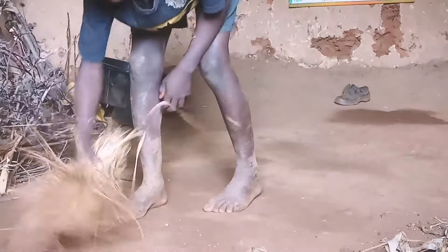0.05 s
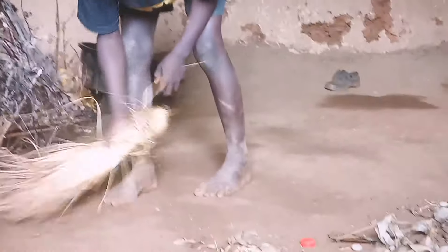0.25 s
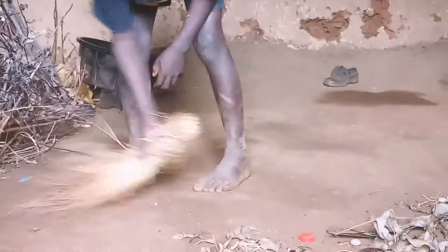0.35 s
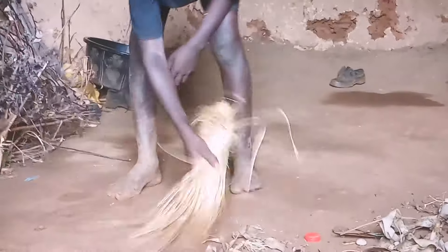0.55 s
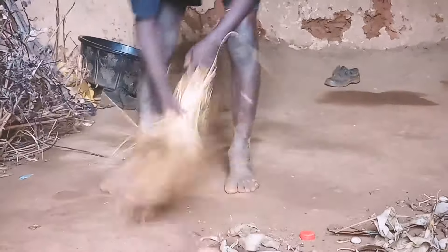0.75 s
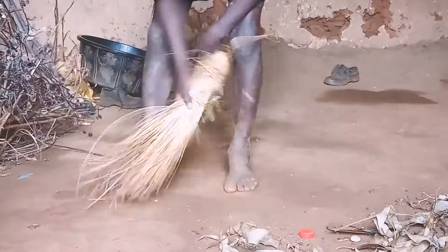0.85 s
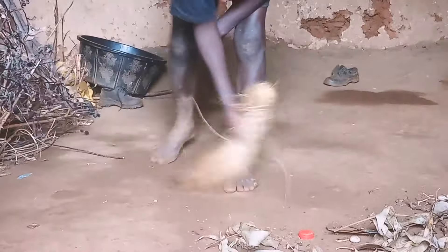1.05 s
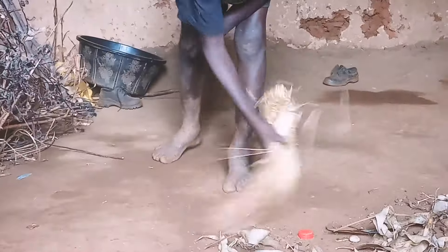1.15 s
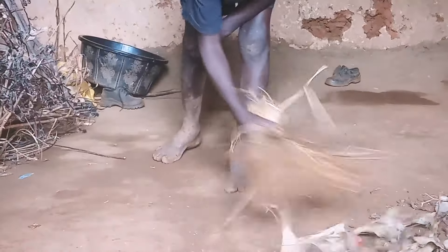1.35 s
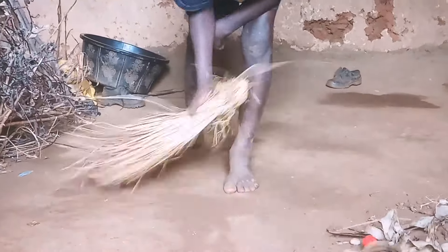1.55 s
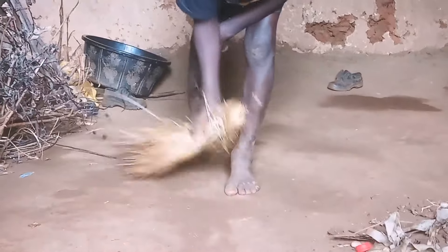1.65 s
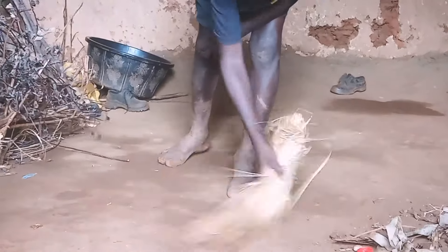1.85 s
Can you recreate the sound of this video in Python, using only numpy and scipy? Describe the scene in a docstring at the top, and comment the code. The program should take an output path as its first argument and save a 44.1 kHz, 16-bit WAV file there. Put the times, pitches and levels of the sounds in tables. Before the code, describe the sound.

A straw hand broom sweeps a dirt yard close to the microphone. Two firm, rasping strokes crush dry leaves and scatter a little grit, then a lighter stroke follows over quiet outdoor air.

```python
"""A straw hand broom sweeps a dirt yard close by: two firm strokes, then a light one.
Hundreds of straw tips catch and slip over rasping dirt and hissing sand, the bundle scuffs the
packed earth, and dry leaves are crushed on the way. Flung grit patters down after the firm strokes,
single straws snap, and the house wall answers faintly over quiet outdoor air."""
import sys
import numpy as np
from scipy import signal
from scipy.fft import rfft, irfft
from scipy.io import wavfile
from scipy.ndimage import uniform_filter1d, map_coordinates

SR = 44100
rng = np.random.default_rng(int(sys.argv[2]) if len(sys.argv) > 2 else 0)


def store_wav(level_fs):
    """Save 16-bit WAV to argv[1]."""
    pcm = np.round(np.clip(np.atleast_2d(level_fs), -1, 1) * 32767)
    wavfile.write(sys.argv[1], SR, pcm.T.astype(np.int16))


N = 83790
T = np.arange(N) / SR


def amp(db):
    """Decibels to gain."""
    return 10 ** (np.asarray(db) / 20)


def unit(x):
    """Scales to unit rms."""
    return x / np.sqrt(np.mean(x ** 2) + 1e-20)


def add(mix, start_s, sound):
    """Mixes a sound in at start_s."""
    part = mix[max(round(start_s * SR), 0):][:len(sound)]
    part += sound[:len(part)]


def wander(span_s):
    """Smooth unit-rms noise that changes over about span_s."""
    hz = np.fft.rfftfreq(N, 1 / SR)
    return unit(irfft(rfft(rng.standard_normal(N)) * np.exp(-(hz * span_s) ** 2), N))


def colour(x, spectrum, size=2048):
    """Minimum-phase filter from (freq_hz, relative_db) rows; keeps the power of white noise."""
    hz, db = np.transpose(spectrum)
    bin_hz = abs(np.fft.fftfreq(size, 1 / SR)) + 1
    log_gain = np.log(amp(np.interp(np.log(bin_hz), np.log(hz), db)))
    response = np.exp(np.conj(signal.hilbert(log_gain)))
    taps = np.fft.ifft(response).real[:size // 2]
    return signal.oaconvolve(x, taps / np.linalg.norm(taps))[:len(x)]


def swells(rows):
    """Sum of rise-hold-release envelopes, one per row."""
    return sum(amp(level_db) * np.interp(T, np.cumsum(timing_s), [0, 1, 1, 0]) ** 2
               for *timing_s, level_db in rows)


def catches(rate_hz=130, max_jolt_db=-9.5, decay_s=0.01):
    """Gain surges: small bunches catch, let go at once and die away."""
    jolts = rng.random(N) * (rng.random(N) < rate_hz / SR)
    return 1 + amp(max_jolt_db) * signal.lfilter([1], [1, -np.exp(-1 / (decay_s * SR))], jolts)


def slips(rate_hz, spread_db, clump_db, tufts=6):
    """Unit-rms friction: clumped tiny clicks from tufts that take turns, each with its own brief ring."""
    ring_s, ring_share = 0.0032, 0.64
    turn_s, turn_db, clump_s = 0.047, 5.5, 0.006
    t, out = np.arange(0, 0.015, 1 / SR), np.zeros(N)
    for _ in range(tufts):
        size_db = spread_db * np.minimum(rng.exponential(1, N), 4)
        size_db += turn_db * np.tanh(wander(turn_s))
        clicks = amp(size_db) * rng.choice([-1, 1], N) * (rng.random(N) < rate_hz / tufts / SR)
        ring = rng.standard_normal(len(t)) * np.exp(-t / ring_s)
        ring *= ring_share / np.linalg.norm(ring)
        ring[0] += 1 - ring_share  # direct click
        out += signal.oaconvolve(clicks, ring)[:N]
    out *= catches() * amp(clump_db * wander(clump_s))
    local_rms = np.sqrt(abs(uniform_filter1d(out ** 2, size=1300)) + 1e-9)
    return unit(out / local_rms)  # evens out slow swings, keeps the fast grain


# freq_hz, relative_db
AIR_SPECTRUM = [(20, -40), (40, -16.5), (60, -6.5), (120, -4.5), (250, -8), (600, -11.5), (1500, -19),
                (3300, -14), (4500, -6), (5300, -3), (7100, 8), (8200, -10.5), (9000, -6.5), (10000, 2),
                (11500, -12), (13300, -20), (15300, -11)]


def air(level_db=-57.5, waver_db=1.3, waver_s=0.006):
    """Faint outdoor rumble and high hiss."""
    return amp(level_db + waver_db * wander(waver_s)) * colour(rng.standard_normal(N), AIR_SPECTRUM)


def yard(x, t60_s=0.1, tail_db=-18, wall_s=0.011, wall_db=-15):
    """Adds one wall echo and a thin, short tail."""
    t = np.arange(SR // 2) / SR
    echoes = rng.standard_normal(len(t)) * (rng.random(len(t)) < 0.1) * amp(-60 * t / t60_s)
    echoes *= amp(tail_db) / np.linalg.norm(echoes)
    add(echoes, wall_s, amp([wall_db]))
    return x + signal.oaconvolve(x, echoes)[:N]


def ground_bounce(x, mean_delay_s=0.00134, swing=0.14, swing_s=0.189, echo_db=-12.5):
    """The ground echo combs the sound; its delay drifts at random as the broom moves."""
    delay_s = mean_delay_s * (1 + swing * np.tanh(wander(swing_s)))
    return x + amp(echo_db) * map_coordinates(x, [(T - delay_s) * SR], order=3)


# start_s, rise_s, hold_s, release_s, level_db
SAND_HISSES = [(.1, 0.045, 0.085, 0.028, -66), (.2, 0.05, 0.091, 0.068, -54), (.83, 0.15, .13, .08, -52),
               (1.51, 0.048, 0.022, .05, -61), (1.56, 0.17, 0.018, .06, -55)]
# freq_hz, relative_db
SAND_SPECTRUM = [(5000, -30), (9000, 0), (11500, -1), (13300, -7), (14500, 9), (15300, -1)]


def sand():
    """Fine sand hisses under the tips."""
    grains = slips(rate_hz=8100, spread_db=0.5, clump_db=-0.5)
    return colour(swells(SAND_HISSES) * grains, SAND_SPECTRUM)


# start_s, rise_s, hold_s, release_s, level_db
GRIT_SHOWERS = [(.54, 0.044, 0.04, 0.026, -64), (1.18, 0.018, 0.024, 0.095, -57),
                (1.255, 0.011, 0.11, 0.027, -59.5), (1.39, 0.012, .01, .03, -62.5)]
# freq_hz, relative_db
GRIT_SPECTRUM = [(500, -24), (1000, -13), (1200, -6), (1450, -2.5), (1750, -1.5), (2170, 8.5), (2550, -0.5),
                 (3000, -4), (3500, -13), (4200, -11), (6000, 9), (12000, -32)]


def grit():
    """Flung crumbs of earth patter down after a firm stroke."""
    patter = slips(rate_hz=1500, spread_db=2.5, clump_db=4.5)
    return colour(swells(GRIT_SHOWERS) * patter, GRIT_SPECTRUM)


# start_s, rise_s, hold_s, release_s, level_db, pitch_hz
EARTH_SCUFFS = [(0.118, 0.12, 0.11, 0.078, -58.5, 712), (0.216, 0.048, 0.13, .04, -64, 556),
                (0.437, 0.028, 0.026, 0.035, -73, 780), (0.88, 0.067, 0.031, .04, -58, 389),
                (0.858, .07, 0.037, 0.063, -54, 985), (0.923, 0.067, 0.072, .06, -62, 628),
                (1.175, 0.014, 0.0086, 0.069, -66, 534), (1.3, 0.024, 0.017, .02, -69.5, 1140),
                (1.531, 0.031, 0.022, 0.15, -68, 1130), (1.531, 0.16, .06, .07, -65.5, 473),
                (1.525, 0.2, 0.034, .06, -66, 770)]
# pitch_ratio, relative_db
SCUFF_SPECTRUM = [(.25, -36.5), (.5, -17.5), (.68, -6.5), (.9, -3.5), (1.05, 3.5), (1.2, -9), (1.6, -12.5),
                  (3, -16), (8, -20.5)]


def scuffs():
    """The bundle scuffs the packed earth, each time at its own low pitch."""
    friction = slips(rate_hz=1500, spread_db=-0.5, clump_db=-2)
    out = np.zeros(N)
    for *swell, pitch_hz in EARTH_SCUFFS:
        rub = swells([swell]) * np.roll(friction, rng.integers(N))
        out += colour(rub, np.multiply(SCUFF_SPECTRUM, [pitch_hz, 1]))
    return out


# start_s, level_db, pitch_hz
STALK_SNAPS = [(.0162, -56.5, 5600), (0.018, -64.5, 2730), (0.027, -77, 4540), (0.2128, -63, 5800),
               (0.2838, -48.5, 5550), (.479, -46, 5860), (0.569, -63, 4500), (.583, -59, 3860),
               (0.705, -59.5, 6500), (1.021, -46.5, 5200), (1.087, -41.5, 7100), (1.2149, -51, 4970),
               (1.249, -58, 7340), (1.283, -65.5, 2100), (1.344, -63, 6940), (1.469, -63.5, 9900),
               (1.8662, -52, 5800), (1.891, -64, 6400)]
# freq_hz, relative_db
SNAP_SPECTRUM = [(400, 4), (2500, -2), (5000, -5), (7100, 3.5), (8300, -7), (10000, 4), (11500, 1),
                 (13300, -50), (15300, -6)]


def snaps(decay_s=0.0012, width_oct=0.58, rebound_s=0.0013, rebound_db=-6, tail_s=0.012, tail_db=-10):
    """A straw or leaf stalk cracks, rebounds at once and rustles briefly."""
    t, out = np.arange(2048) / SR, np.zeros(N)
    hz = np.fft.rfftfreq(len(t), 1 / SR) + 1
    crack = np.exp(-t / decay_s)
    rebound = amp(rebound_db) * (t > rebound_s) * np.exp(-abs(t - rebound_s) / decay_s)
    rustle = amp(tail_db) * np.exp(-t / tail_s)
    for start_s, level_db, pitch_hz in STALK_SNAPS:
        burst = colour(rng.standard_normal(len(t)) * (crack + rebound + rustle), SNAP_SPECTRUM)
        body_db = -20 * np.log10(1 + (2 * np.log2(hz / pitch_hz) / width_oct) ** 2)
        snap = colour(burst, np.column_stack([hz, body_db]))
        add(out, start_s, amp(level_db) * unit(snap))
    return out


# start_s, rise_s, hold_s, release_s, level_db
LEAF_CRUSHES = [(.215, 0.047, 0.043, 0.14, -42), (.355, 0.0061, 0.042, 0.14, -28.5),
                (.93, 0.056, 0.12, 0.15, -37), (1.51, 0.022, 0.021, 0.067, -47.5),
                (1.6, .14, .02, 0.054, -50)]
# freq_hz, relative_db
LEAF_SPECTRUM = [(700, -42), (1500, -28.5), (2150, -14.5), (3400, -13), (5200, -7.5), (6200, -1), (6900, 6),
                 (7600, -8.5), (8300, -10), (9200, -11), (10000, -3.5), (11000, -9), (12300, -31),
                 (13700, -10.5), (14700, -25), (15300, -1.5)]


def leaves():
    """Dry leaves crackle brightly as the broom crushes them."""
    crackle = slips(rate_hz=9100, spread_db=3.5, clump_db=1.5)
    return colour(swells(LEAF_CRUSHES) * crackle, LEAF_SPECTRUM)


# Stroke envelopes, before trim: time_s, straw_db, dirt_db
FIRST_FIRM_STROKE = [(0.1, -61, -68), (0.13, -48, -59.5), (0.214, -45, -55), (0.294, -35.5, -46),
                     (0.352, -41.5, -53), (0.366, -29.5, -44.5), (0.4, -32.5, -43.5), (0.542, -43, -54.5),
                     (0.612, -50.5, -55.5), (0.718, -53.5, -72.5), (0.8, -64, -77)]
SECOND_FIRM_STROKE = [(0.81, -59, -76), (0.846, -44.5, -54), (0.91, -36, -42), (1.044, -33, -40.5),
                      (1.112, -34, -49), (1.19, -47.5, -54), (1.212, -50.5, -49.5), (1.26, -52.5, -64),
                      (1.35, -52.5, -83), (1.44, -84, -90)]
LIGHT_STROKE = [(1.45, -66, -75), (1.474, -56, -62.5), (1.504, -57, -67.5), (1.55, -51, -57),
                (1.596, -55.5, -64.5), (1.628, -51, -64), (1.758, -45, -56), (1.84, -63.5, -75.5)]
# freq_hz, relative_db
STRAW_SPECTRUM = [(1500, -40), (3400, -17.5), (3750, -8), (4300, -9.5), (4650, -6), (5050, -0.5),
                  (5650, -1), (6150, 0.5), (6500, -1.5), (7050, 0), (7600, -7), (8300, -20.5), (9000, -13),
                  (10000, -10), (11000, -18), (12300, -23.5), (13500, -30), (14600, -16), (15300, -11)]
DIRT_SPECTRUM = [(300, -38), (700, -20.5), (1100, -7), (1400, -3.5), (1700, -6.5), (1950, -4.5), (2170, 2),
                 (2400, -1), (2700, 3), (3100, 1.5), (3420, -6.5), (3750, 1), (4300, 1.5), (5500, -10),
                 (9000, -34)]


def broom(straw_trim_db=-3, dirt_trim_db=-1):
    """Straw tips catch and slip while the dirt rasps under them."""
    time_s, straw_db, dirt_db = np.vstack([FIRST_FIRM_STROKE, SECOND_FIRM_STROKE, LIGHT_STROKE]).T
    tips = slips(rate_hz=14000, spread_db=2, clump_db=0.55)
    tips *= amp(straw_trim_db + np.interp(T, time_s, straw_db))
    rasp = slips(rate_hz=8000, spread_db=2.5, clump_db=0.8)
    rasp *= amp(dirt_trim_db + np.interp(T, time_s, dirt_db))
    return colour(tips, STRAW_SPECTRUM) + colour(rasp, DIRT_SPECTRUM)


def scene():
    """Sweeping in the open yard, mono."""
    sweeping = ground_bounce(broom()) + scuffs() + sand() + leaves() + grit() + snaps()
    return (yard(sweeping) + air())[None]


def record(dry, cutoff_hz=15470):
    """Steep low-pass."""
    taps = signal.firwin(601, cutoff_hz, window=("kaiser", 9), fs=SR)
    return signal.oaconvolve(dry, taps[None], "same")


dry = scene()
out = record(dry)
store_wav(out)
```